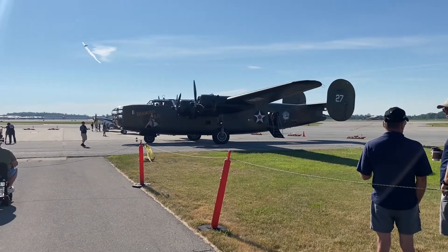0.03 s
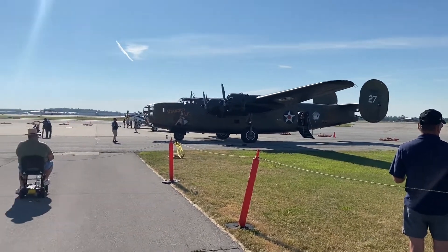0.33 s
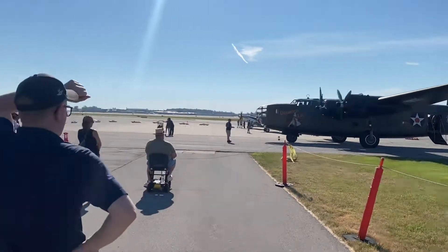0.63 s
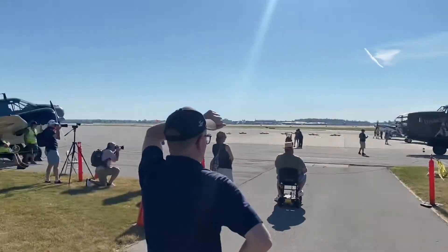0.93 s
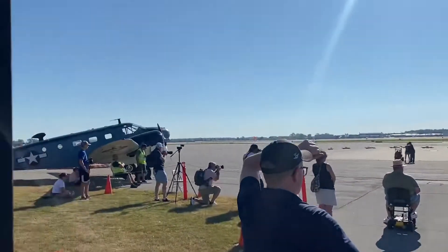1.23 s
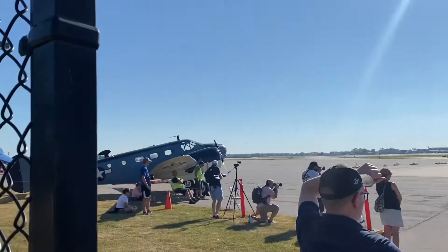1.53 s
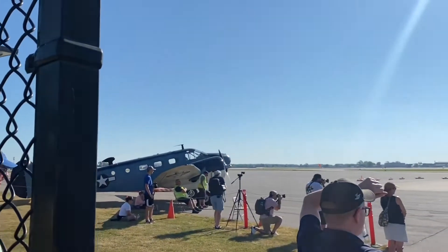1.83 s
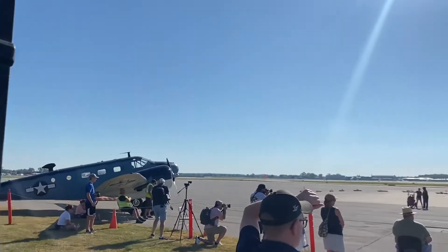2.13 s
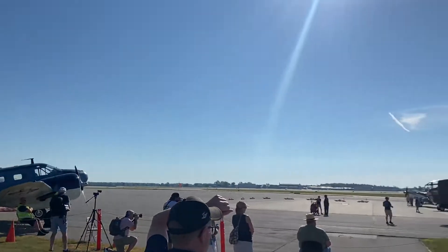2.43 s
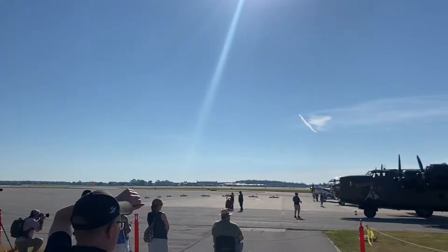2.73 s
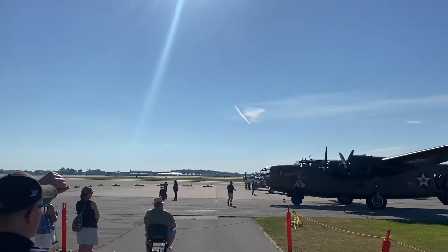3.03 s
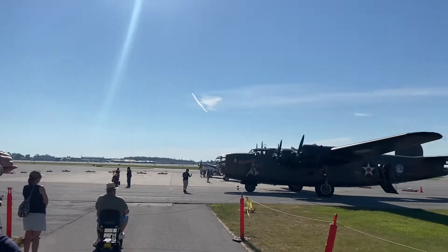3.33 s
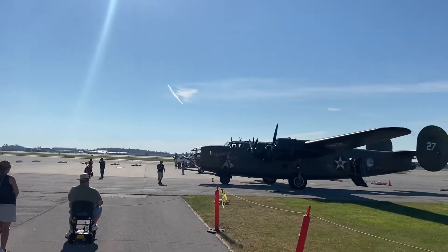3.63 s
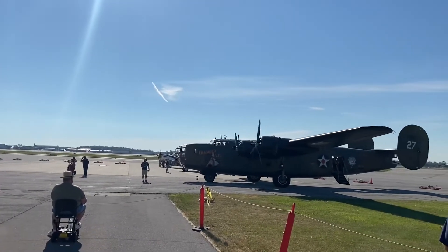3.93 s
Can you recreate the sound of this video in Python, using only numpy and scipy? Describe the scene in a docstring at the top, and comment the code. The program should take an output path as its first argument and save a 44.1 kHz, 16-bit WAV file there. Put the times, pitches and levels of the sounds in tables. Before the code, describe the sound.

A bomber's four big piston engines idle on an open apron throughout, their low throb loping under rushing propeller air. The exhaust booms, rasps and hisses, with small clanking spits and, from about 0.7 seconds, brief honking firings. The microphone swings away, shifting the sound rightward, most near 2 seconds, with a faint hollow sweep in the hiss. By 4 seconds it is centred again, the engines still idling.

```python
"""Four big radial piston engines of a bomber idle on an open apron. From the start each runs at its own
speed, so their throb beats and lopes under the rush of the propellers. Every firing booms, barks, rasps
and hisses in the exhaust; all along, cylinders spit with a clank, and from 0.7 s the hardest firings
make a pipe honk. The microphone swings away, so the sound reaches its right port first, most of all
near 2 s, and hollow notches sweep the treble. By 4 s it has swung back, and the engines idle on."""
import sys
import numpy as np
from scipy import signal
from scipy.fft import rfft, irfft, next_fast_len
from scipy.io import wavfile
from scipy.ndimage import uniform_filter1d, map_coordinates

SR = 44100
rng = np.random.default_rng(int(sys.argv[2]) if len(sys.argv) > 2 else 0)


def log_audio(samples):
    """Write samples as a 16-bit WAV file to the path given in sys.argv[1]."""
    # one column per channel
    frames = np.atleast_2d(samples).T
    # limit to full scale, then quantise
    limited = np.clip(frames, -1, 1)
    pcm = np.round(limited * 32767).astype(np.int16)
    wavfile.write(sys.argv[1], SR, pcm)


N = 176400

# The engines. Each row: working cycles per second, then relative boom, bark and hiss/rasp levels in dB.
ENGINES = [(3.859, 0.5, 2, -4), (3.519, -2.5, -5, 0), (3.752, -4, -9, -5), (3.012, -6, -15, -12.5)]
# The first engine's lope. Each entry: one cylinder's relative bark in dB, in firing order.
CYLINDER_DB = [-4.5, -11, -6, -2, 0, -8, -16, -3.5, -5.5, -3, -3, -3.5, 1, 0, 3, 3.5, -0.5, -5.5]
# Strong exhaust tones. Each row: multiple of the cycle rate, then its level in dB in each engine.
EXHAUST_ORDERS = [(14,-31,-29.5,-34,-54),(15,-42,-26,-37,-48),(16,-32.5,-29,-42,-46),(17,-32.5,-30,-42.5,-35),(18,-29,-28.5,-34,-31.5),
                  (19,-37,-25,-26.5,-46),(22,-25,-38.5,-49,-41),(24,-21.5,-26,-28.5,-22.5),(26,-39.5,-33,-38,-31.5),(30,-33.5,-35,-34.5,-37),
                  (32,-24.5,-25.5,-30.5,-44),(34,-34.5,-35,-36.5,-48),(38,-31,-31.5,-37.5,-47)]
# Sharp spits. Each row: peak time in seconds, relative level in dB, clank pitch in Hz.
SPITS = [(0.05, -22, 3880), (0.081, -27, 5100), (0.142, -23.5, 3140), (0.223, -21.5, 4070),
         (0.253, -23.5, 3220), (0.334, -22.5, 3830), (0.366, -24, 5010), (0.569, -26.0, 6250),
         (0.615, -22.0, 6040), (0.648, -23, 4840), (0.818, -24.5, 7800), (0.853, -25, 4730),
         (0.9, -23.5, 4400), (0.936, -22, 2860), (1.106, -24.0, 2750), (1.466, -26, 3310),
         (1.75, -25.5, 7480), (1.788, -26, 2630), (1.956, -24.5, 5080), (2.037, -19.5, 5020),
         (2.07, -26.5, 5020), (2.243, -21.5, 3420), (2.322, -21, 3380), (2.384, -26.5, 3340),
         (2.497, -22, 4330), (2.528, -27, 3650), (2.619, -24.5, 4860), (2.668, -22.5, 7100),
         (2.702, -28, 4890), (2.747, -17.5, 4990), (2.782, -30, 4700), (2.809, -23.5, 5040),
         (2.923, -21.5, 4840), (3.065, -23, 7590), (3.094, -22, 3400), (3.174, -21.5, 2920),
         (3.209, -23.5, 4720), (3.348, -23.5, 3660), (3.38, -21.5, 4525), (3.494, -24.5, 4360),
         (3.602, -20.5, 2870), (3.636, -22, 4740)]
# The hardest firings. Each row: peak time in seconds, relative level in dB, pipe pitch in Hz.
HONKS = [(0.707, -17, 438), (0.88, -11, 349), (1, -15, 409), (1.139, -14.5, 352), (1.279, -21.0, 465),
         (1.447, -17, 340), (1.515, -15, 486), (1.735, -11, 351), (1.922, -14, 380), (2.017, -18, 478),
         (2.115, -16, 450), (2.299, -14, 360), (2.542, -18.5, 427), (2.725, -13, 394), (2.904, -21.0, 357),
         (3.061, -15, 374), (3.167, -19, 383), (3.294, -15.5, 450), (3.541, -16, 445), (3.866, -20, 456)]
# The tone colour of each layer. Each row: frequency in Hz, relative level in dB.
WASH_EQ = [(20, -7), (60, -10), (240, 6), (400, 4.5), (700, -1), (1400, 2.5), (2300, -5), (3000, -7),
           (4800, -10.5), (6000, -13.5), (8000, -20), (11000, -20.5), (13000, -33), (15800, -45)]
RASP_EQ = [(400, -24), (640, -2.5), (930, 3), (1130, -3), (1450, -1), (4000, -31.5)]
SPIT_EQ = [(900,3),(2900,3),(4900,3),(7600,5.5),(11000,0),(13000,-12),(15800,-16)]
BOOM_EQ = [(20, -18), (33, -22), (42, -15), (52, -6), (65, -5), (100, -2), (125, -2), (190, -4.5),
           (240, -22), (400, -71)]
BARK_EQ = [(150, -12), (240, -13.5), (310, 0.5), (380, -2), (460, -1), (560, -5.5), (660, -10),
           (900, -17.5), (1500, -25), (2400, -40), (5000, -50)]
HISS_EQ = [(900, -19), (2300, -6.5), (2850, 5.5), (3150, 4), (3400, 4.5), (3700, 1.5), (4100, 4.5),
           (4500, 3), (5000, 3.5), (5900, -1), (7500, 1.5), (10500, -6), (13000, -15), (15800, -33)]
# Slow level rides. Each row: time in seconds, gain of rasp and wash in dB, gain of hiss in dB.
RIDES = [(0,0.5,1),(.7,1.5,0),(1.8,-0.5,-1),(2.4,-0.5,-1),(4,1,-0.5)]
# The microphone's swing. Each row: time in seconds, left port's lead in ms (negative: right is first).
SWING = [(0,0.053),(.37,0.011),(.8,-.23),(1.37,-.36),(1.95,-.37),(2.37,-0.25),(2.9,-0.12),(4,-0.013)]
# Two sweeping notches, a list each. Each row: time in seconds, centre in Hz, left and right cut in dB.
NOTCHES = [
    [(.5, 4000, 1, 2), (.65, 3150, -1, 14), (.85, 2400, 2, 3.5), (2.65, 2400, -1, -2),
     (2.95, 3380, -1.5, 16), (3.1, 4760, 2, 17), (3.3, 5600, 0, 18), (4, 6030, 4, 8.5)],
    [(.9, 5600, 2, 6), (1.05, 5100, -1, 5), (1.35, 4300, -0.5, 5), (1.75, 3840, 4, 10),
     (2.05, 4500, 1.5, 7), (2.3, 5300, -3.5, 4), (2.65, 6240, 3, 7)],
]
# Stereo balance. Each row: frequency in Hz, left over right in dB.
BALANCE = [(60, 3.5), (200, 2.5), (400, 2.5), (700, -0.5), (1300, 2.5), (2500, 0.5), (4500, 2.5),
           (8000, -0.2), (15000, 0)]
# Stereo width: mostly centred, with two narrow, very wide treble bands near 9 and 13 kHz.
# Each row: frequency in Hz, side over mid in dB.
WIDTH = [(60, -12), (200, -17), (500, -7.5), (1500, -11.5), (4000, -9.5), (7300, -15), (9000, 20.5),
         (10300, -6), (12000, -5), (13300, 14), (15000, 3)]


def amp(db):
    """Decibels to gain."""
    return 10 ** (np.asarray(db) / 20)


def unit(x):
    """Scale to rms 1."""
    return x / np.sqrt(np.mean(x ** 2) + 1e-20)


def eq_db(points, hz):
    """Read an EQ curve on a log frequency axis."""
    freqs, db = np.transpose(points)
    return np.interp(np.log(hz + 1), np.log(freqs + 1), db)


def automation(rows, seconds=np.arange(N) / SR):
    """One curve for each column after the time."""
    times, *columns = np.transpose(rows)
    return [np.interp(seconds, times, column) for column in columns]


def wobble(rate):
    """A smooth random curve, rate knots a second."""
    knots, steps = rng.standard_normal(64), np.arange(0, N, 100)
    coarse = map_coordinates(knots, [steps * rate / SR], mode="mirror")
    return np.interp(np.arange(N), steps, coarse)


def filtered(x, response):
    """Filter x by a gain that depends on frequency."""
    size = next_fast_len(N + SR // 4)
    return irfft(rfft(x, size) * response(np.fft.rfftfreq(size, 1 / SR)), size)[..., :N]


def coloured(pair, eq):
    """Two unrelated signals become the mid and side of one tone colour, total power 1."""
    def response(hz):
        side = amp(eq_db(WIDTH, hz))
        return amp(eq_db(eq, hz)) * np.array([np.ones_like(side), side]) / np.sqrt(1 + side ** 2)
    return unit(filtered(pair, response)) / np.sqrt(2)


def patchy(pair, depth_db):
    """Make the colour flicker in narrow, short-lived patches."""
    spectra = signal.stft(pair, nperseg=512)[2]
    patches = uniform_filter1d(rng.standard_normal(spectra.shape[1:]), size=4, axis=0)
    patches = uniform_filter1d(patches, size=24, axis=1)
    return unit(signal.istft(spectra * amp(depth_db * unit(patches)), nperseg=512)[1][:, :N])


def add(track, start_s, sound):
    """Mix a sound into a track."""
    i = int(round(start_s * SR))
    a, b = max(i, 0), min(i + sound.shape[-1], N)
    if b > a:
        track[..., a:b] += sound[..., a - i:b - i]


def puff(rise_s, steep):
    """Envelope of a gas puff that peaks after rise_s."""
    age = np.arange(SR // 25) / SR / rise_s
    return (age * np.exp(1 - age)) ** steep


def pipe_ring(hz, width_hz, size):
    """A pipe resonance whose wandering phase smears its pitch over width_hz."""
    wander = np.sqrt(2 * np.pi * width_hz / SR) * np.cumsum(rng.standard_normal(size))
    return np.sqrt(2) * np.sin(2 * np.pi * (hz * np.arange(size) / SR + rng.random()) + wander)


def propeller_wash(level_db=-26.5):
    """The bed: a broad rush of air from the propellers that flutters a little."""
    ride_db, _ = automation(RIDES)
    flutter_db = 0.7 * wobble(15)
    return amp(level_db + ride_db + flutter_db) * coloured(rng.standard_normal((2, N)), WASH_EQ)


def rasp(level_db=-31, fronts_per_firing=2, jitter_s=0.00012):
    """Each firing leaves the pipe as sharp pressure fronts; their regular trains buzz."""
    fronts, cylinders = np.zeros((2, N)), len(CYLINDER_DB)
    for cycle_hz, _, _, db in ENGINES:
        firing_hz = cylinders * cycle_hz
        beats = np.arange(16 * cylinders) / firing_hz
        for _ in range(fronts_per_firing):
            times = beats + rng.random() / firing_hz + jitter_s * rng.standard_normal(len(beats))
            samples = np.clip(times * SR, 0, N).astype(int)
            heights = amp(db + 2 * rng.standard_normal((2, len(beats))))
            heights[1] *= rng.choice([-1, 1], len(beats))  # random polarity unties side from mid
            fronts += [np.bincount(samples, row, N + 1)[:N] for row in heights]
    ride_db, _ = automation(RIDES)
    return amp(level_db + ride_db) * coloured(fronts, RASP_EQ)


def spits(gain_db=1.5, clank_db=-4.5, rise_s=0.0069):
    """Short, dry escapes of gas; each rings the pipe with a metallic clank."""
    envelope, clank = np.zeros(N), np.zeros(N)
    shape = puff(rise_s, steep=3)
    for peak_s, db, hz in SPITS:
        burst = amp(db + gain_db) * shape
        ring = pipe_ring(hz, width_hz=170, size=len(shape))
        add(envelope, peak_s - rise_s, burst)
        add(clank, peak_s - rise_s, amp(clank_db) * burst * ring)
    gas = coloured(patchy(rng.standard_normal((2, N)), depth_db=2.5), SPIT_EQ)
    return envelope * gas + [clank, np.zeros(N)]


def honks(gain_db=-3.5, rise_s=0.011):
    """The hardest firings make an exhaust pipe honk for a moment."""
    mid, shape = np.zeros(N), puff(rise_s, steep=3)
    for peak_s, db, hz in HONKS:
        ring = pipe_ring(hz, width_hz=50, size=len(shape))
        add(mid, peak_s - rise_s, amp(db + gain_db) * shape * ring)
    return np.array([mid, np.zeros(N)])


def firings(engine_db, patterns, rise_s, late_s, fresh, scatter_db, uneven_db=2.5):
    """One puff per firing; each cylinder has its own pipe sound, with a share of fresh noise each time."""
    track, shape, cylinders = np.zeros((2, N)), puff(rise_s, steep=1.04), len(CYLINDER_DB)
    for engine, (cycle_hz, *_) in enumerate(ENGINES):
        # an engine without a listed pattern gets randomly uneven cylinders
        cylinder_db = patterns.get(engine, uneven_db * rng.standard_normal(cylinders) - uneven_db)
        pipes = rng.standard_normal((cylinders, 2, len(shape)))
        for firing in range(-2, 16 * cylinders):
            cylinder = firing % cylinders
            noise = rng.standard_normal(pipes.shape[1:])
            gas = np.sqrt(1 - fresh) * pipes[cylinder] + np.sqrt(fresh) * noise
            db = engine_db[engine] + cylinder_db[cylinder] + scatter_db * rng.standard_normal()
            peak_s = firing / (cylinders * cycle_hz) + late_s
            add(track, peak_s - rise_s, amp(db) * shape * gas)
    return track


def exhaust(boom_db=-19, bark_db=-23, hiss_db=-30.5):
    """Every firing gives a low boom, a midrange bark and a bright hiss."""
    _, boom_mix, bark_mix, hiss_mix = np.transpose(ENGINES)
    _, ride_db = automation(RIDES)
    boom = firings(boom_mix, {}, rise_s=0.0051, late_s=0.002, fresh=0.42, scatter_db=0)
    bark = firings(bark_mix, {0: CYLINDER_DB}, rise_s=0.00502, late_s=0.00299, fresh=0.44, scatter_db=1)
    hiss = firings(hiss_mix, {}, rise_s=0.004, late_s=0.003, fresh=0.62, scatter_db=2.3)
    return (amp(boom_db) * coloured(boom, BOOM_EQ)
            + amp(bark_db) * coloured(bark, BARK_EQ)
            + amp(hiss_db + ride_db) * coloured(patchy(hiss, depth_db=3), HISS_EQ))


def throb(sway_db=0.5, drift_cycles=0.00081):
    """The weight of the idle: low exhaust tones of the four engines beat against each other."""
    mid, t = np.zeros(N), np.arange(N) / SR
    for engine, (cycle_hz, *_) in enumerate(ENGINES):
        cycles = cycle_hz * t + drift_cycles * wobble(1.64)
        for order, *levels_db in EXHAUST_ORDERS:
            gain = np.sqrt(2) * amp(levels_db[engine] + sway_db * wobble(3.03))
            mid += gain * np.sin(2 * np.pi * (order * cycles + rng.random()))
    return np.array([mid, np.zeros(N)])


def microphone_swing(pair, lag_below_hz=2350, notch_width_hz=360):
    """As the microphone turns, the lows reach one port later and hollow notches sweep the treble."""
    hz, seconds, spectra = signal.stft(pair, SR, nperseg=1024, noverlap=768)
    hz = hz[:, None]
    lead_ms, = automation(SWING, seconds)
    delay = np.exp(-2j * np.pi * hz * lead_ms / 1000)
    lows = 1 / (1 + (hz / lag_below_hz) ** 10)
    spectra[1] *= lows * delay + 1 - lows
    for notch in NOTCHES:
        centre_hz, left_db, right_db = automation(notch, seconds)
        bell = np.exp(-0.5 * ((hz - centre_hz) / notch_width_hz) ** 2)
        spectra *= amp(-np.array([left_db, right_db])[:, None] * bell)
    return signal.istft(spectra, SR, nperseg=1024, noverlap=768)[1][:, :N]


def scene():
    """All layers, mixed as mid and side, meet the left and right ports of the swinging microphone."""
    mid, side = throb() + exhaust() + honks() + rasp() + spits() + propeller_wash()
    return microphone_swing(np.array([mid + side, mid - side]))


def record(dry, ceiling=0.96, top_hz=15830):
    """Lean the mix a little to the left, round off the highest peaks and cut the very top."""
    leaning = filtered(dry, lambda hz: amp(eq_db(BALANCE, hz) * np.array([[0.5], [-0.5]])))
    rounded = leaning / (1 + np.abs(leaning / ceiling) ** 10) ** (1 / 10)
    return filtered(rounded, lambda hz: hz < top_hz)


dry = scene()
out = record(dry)
log_audio(out)
```